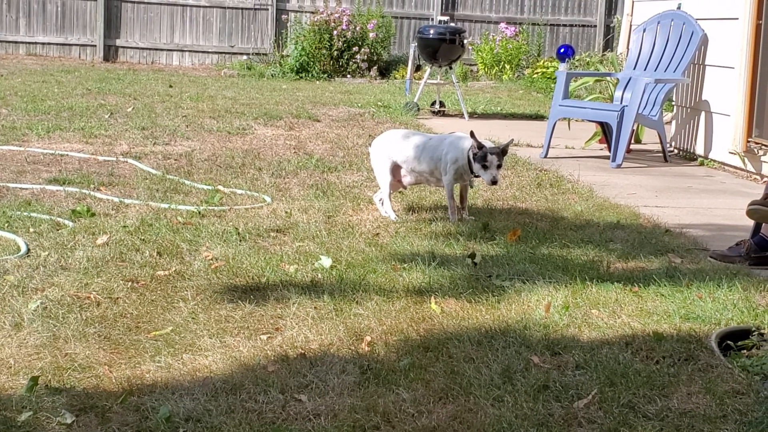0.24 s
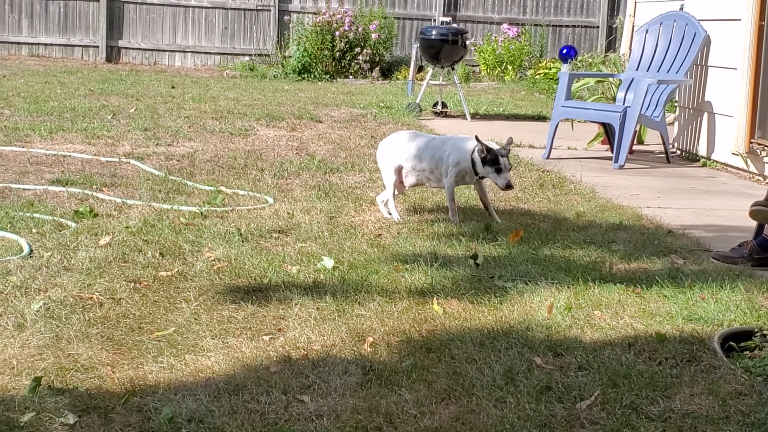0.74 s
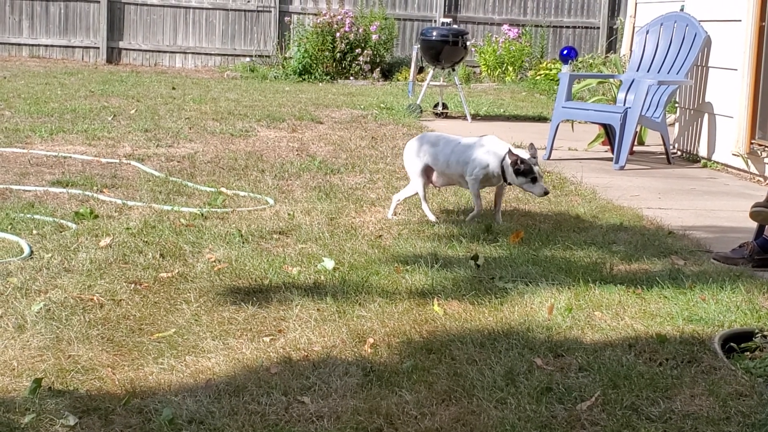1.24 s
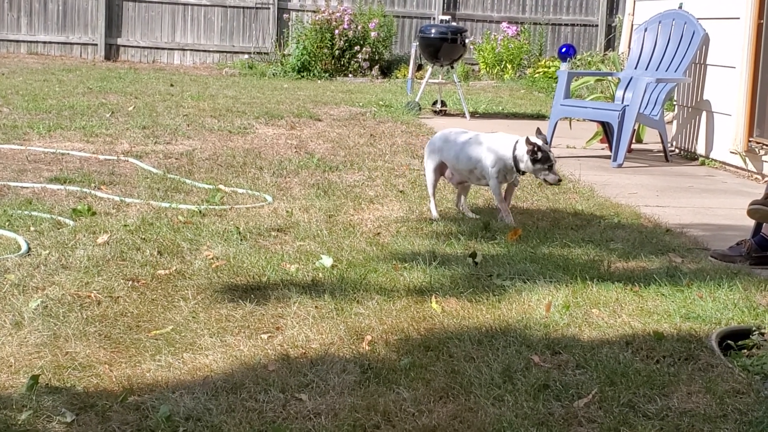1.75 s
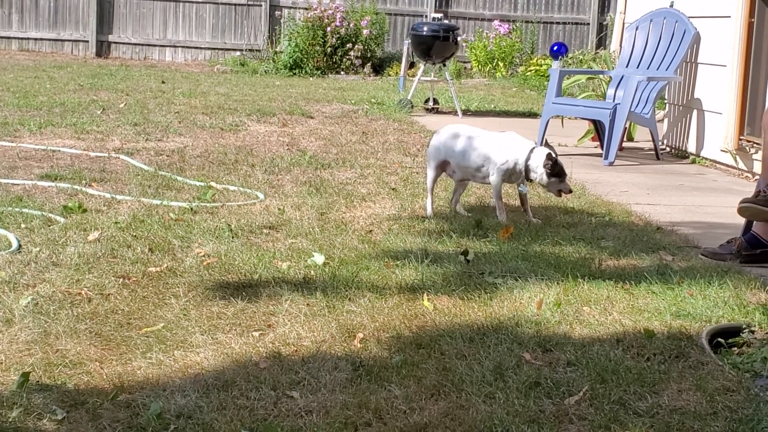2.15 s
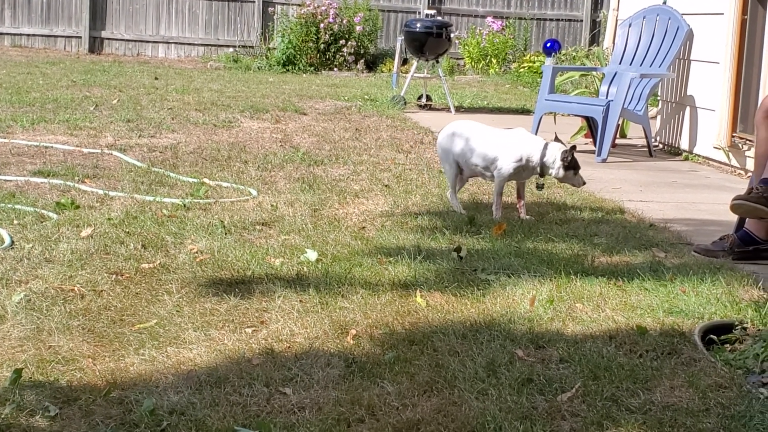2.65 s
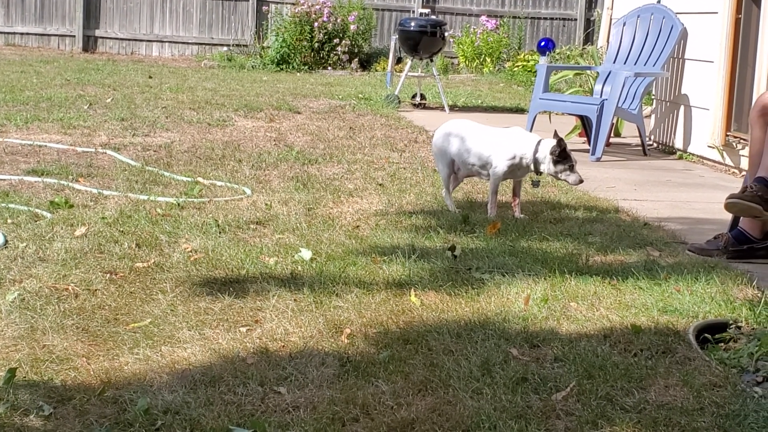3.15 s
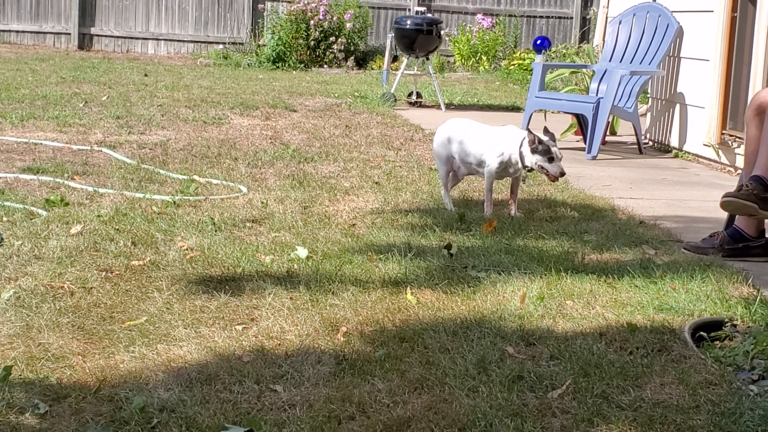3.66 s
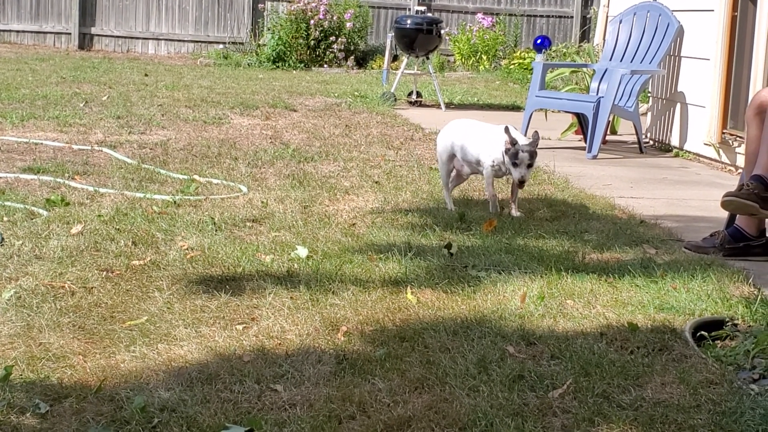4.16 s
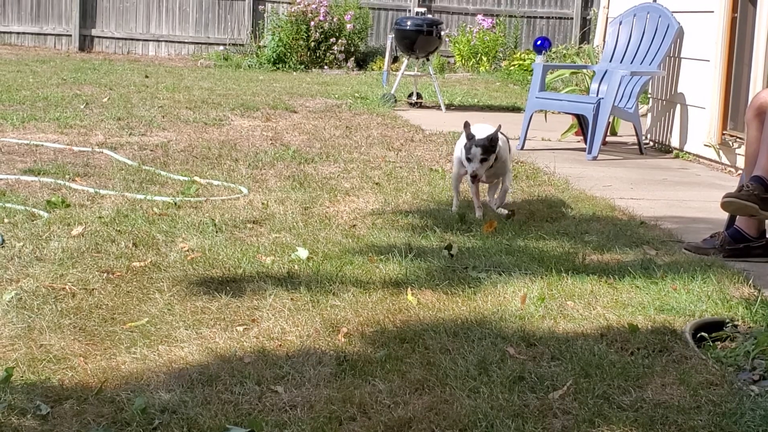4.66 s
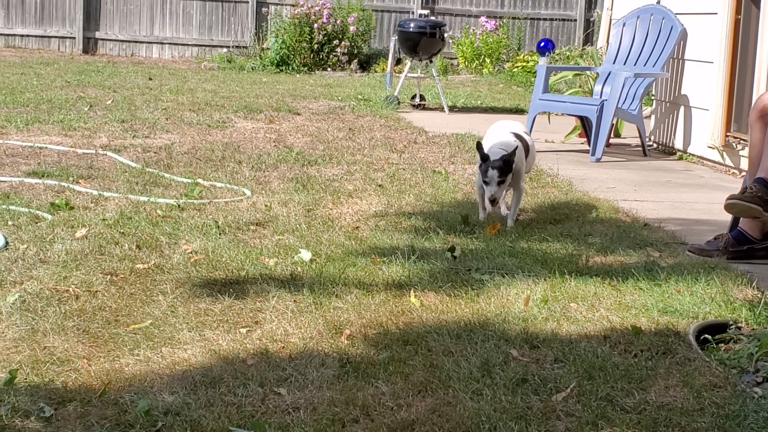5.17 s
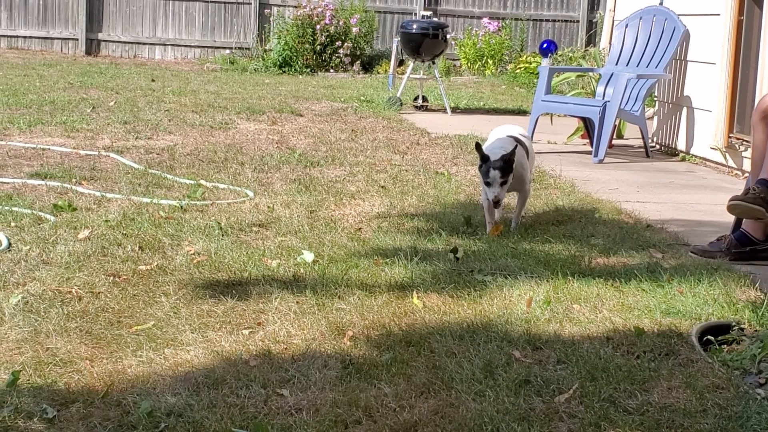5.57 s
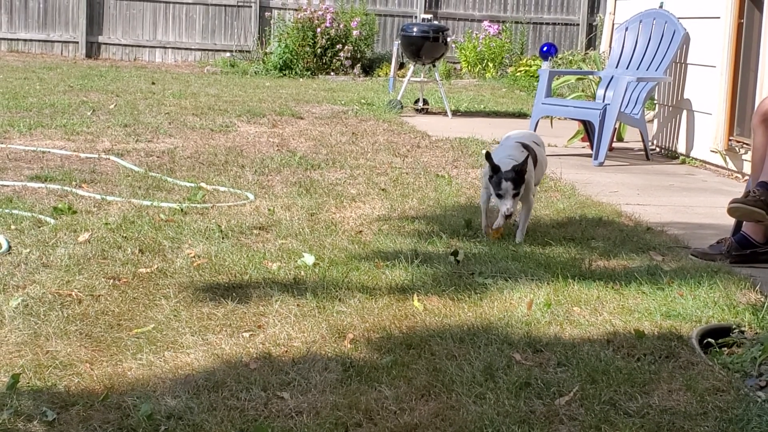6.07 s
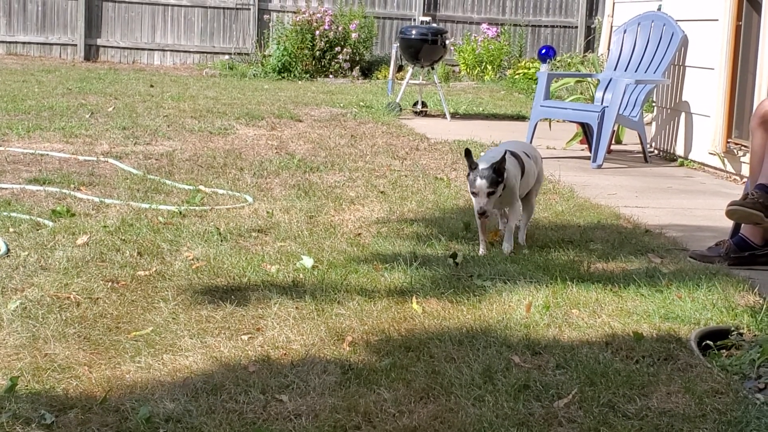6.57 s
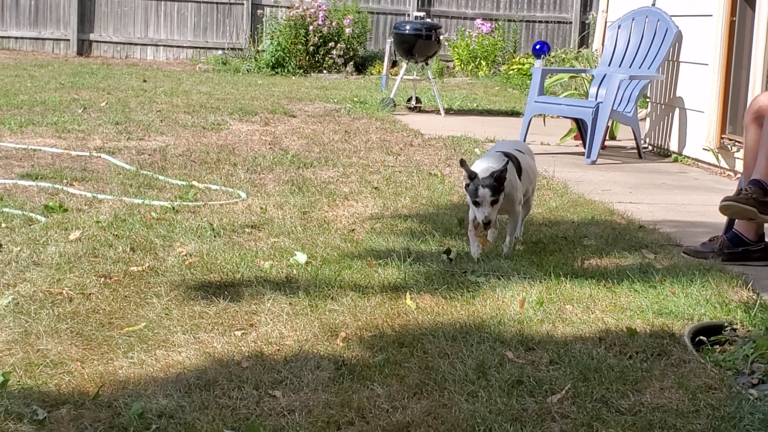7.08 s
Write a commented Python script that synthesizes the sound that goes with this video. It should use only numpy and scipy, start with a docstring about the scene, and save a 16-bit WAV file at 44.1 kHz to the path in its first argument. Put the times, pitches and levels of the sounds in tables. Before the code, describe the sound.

An outdoor stereo microphone sits in a fenced backyard, a road some seventeen metres away. From 0 s a vehicle is already approaching, with a deep throbbing exhaust drone around 55 to 110 Hz over soft rumble and airy tyre noise. The low tones swell and dip unevenly, as if reflected between walls. Very faint grass brushing and stalk ticks come near 1.5 to 1.9 s. The growl thickens to its fullest around 4 s as the vehicle draws abreast; a short soft scuff sounds at 3.6 s and a light step with a snap at 4.2 s. The engine pitch then slides lower as it moves away, while hollow tyre thrum, hiss and tread roar linger, the roar strongest near 6.9 s. A tiny high collar tag clink comes at 5.1 s. Dry-grass steps grow clearer at 5.7, 6.4, 6.9 and 7.2 s, with crisp snaps. The road noise is still present at the end.

```python
"""A vehicle with a deep exhaust passes on a road 16.9 m away, behind a fenced backyard with a two-port
microphone. Crank-locked harmonics sink in pitch by Doppler shift and engine sag; the deepest swell and fade
among the walls. Filtered noise gives the engine's rumble and growl, the tyres' thrum and hiss, and a building
roar of road traffic. Close by, a small dog steps through dry grass (grainy noise bursts and snaps), its collar
tag clinks once as two decaying sines, and something scuffs the ground softly."""
import sys
import numpy as np
from scipy.fft import rfft, irfft
from scipy.io import wavfile

SR = 44100
rng = np.random.default_rng(int(sys.argv[2]) if len(sys.argv) > 2 else 0)


def transcribe(u):
    """Save the signal u as a 16-bit wav file named by the first command-line argument.

    u: samples, shape (n,) or (channels, n), limited to [-1, 1]; the rate is SR.
    q: integer samples, one column per channel.
    """
    v = np.clip(np.atleast_2d(u).T, -1, 1)
    q = np.round(v * 32767).astype(np.int16)
    wavfile.write(sys.argv[1], SR, q)


N = 322812

# The pass: moment abreast of the yard, road speed, closest distance, speed of sound
ABREAST_S, SPEED_M_PER_S, DISTANCE_M, SOUND_M_PER_S = 4.004, 16.0, 16.9, 343
# Crankshaft turns per second when abreast; the engine slowly winds down
CRANK_HZ, SAG_HZ_PER_S = 27.27, 0.131

# Deep exhaust harmonics: crank_order, level_db (abreast, before the fades)
EXHAUST_HARMONICS = [(2, -29.5), (3, -36), (4, -29)]
# Swells and fades of those harmonics among the house walls: time_s, change_db
FADE_ORDER_2 = [(0.08, 0.5), (1.6, -0.5), (2.12, -13), (2.28, -3), (2.56, 3.5), (2.8, -10.5), (3.56, 3.5),
                (4.46, 0), (4.66, 4.5), (4.92, 3.5), (5.36, -12.5), (5.6, -10), (5.95, -5), (6.45, -7),
                (7.2, 0.5)]
FADE_ORDER_3 = [(0.26, 1.5), (3.159, -3.5), (4.18, 6), (4.55, -16), (4.8, 0), (5.5, 7), (6.2, 3),
                (6.55, -0.5), (7.2, 6.5)]
FADE_ORDER_4 = [(0.0, -9), (0.4, 0.5), (2.46, 4), (2.84, -5.5), (3.2, 0.5), (3.4, -8.5), (3.76, 1),
                (4.58, 2), (4.72, -4.0), (5.34, -0.5), (5.84, 5.5), (6.12, 6.5), (7.04, -5.5)]
WAVER_DB = 0.6   # moment-to-moment unevenness of the deep harmonics

# Tailpipe bark, lifted where the pipe points at the yard: crank_order, level_db (abreast, before the lift)
BARK_HARMONICS = [(5, -44.5), (6, -48)]
# Bearing and width of the beam (0 abreast, 1 far past), and the lift at its centre
PIPE_AIM, BEAM_WIDTH, BEAM_DB = 0.43, 0.36, 6

# Weak upper harmonics: crank_order, level_db (relative to the growl level)
UPPER_HARMONICS = [(7, -8.5), (8, -6.5), (9, -12.5), (10, -14.5), (11, -15), (12, -8.5), (13, -16.5)]
SCREENED_DB_PER_STEP = 2.1   # far ahead, the houses screen the top harmonics

# Rumble of uneven firing between the harmonics: frequency_hz, relative_db_per_hz
RUMBLE_SPECTRUM = [(20, -20), (34, -17.5), (48, -6.5), (68, -2), (95, -5), (125, -4.5), (165, -15.5),
                   (220, -27), (400, -73)]
# Engine-bay drone: frequency_hz, relative_db_per_hz
GROWL_SPECTRUM = [(100, -4.5), (160, 6.5), (220, 1), (270, -1), (330, -1.5), (410, -9.5), (520, -27),
                  (800, -42)]
# Level of growl and upper harmonics through the pass: time_s, level_db
GROWL_LEVEL = [(0.0, -61.5), (1.2, -59.5), (1.5, -55.5), (2.4, -54.5), (3.2, -52.5), (3.9, -46),
               (4.9, -50.5), (6.2, -48.4), (7.32, -52)]

# Hollow thrum of the tyre bodies: frequency_hz, relative_db_per_hz
THRUM_SPECTRUM = [(250, -19), (420, -12.5), (510, -5.5), (620, -3), (740, -0.5), (820, 1.5), (950, -20.5),
                  (1300, -47)]
# Roar of general road traffic: frequency_hz, relative_db_per_hz
ROAR_SPECTRUM = [(300, -17), (600, -22), (730, -2), (840, 3), (1030, -0.5), (1300, 2), (1550, -1),
                 (1850, -2.5), (2200, -8), (2900, -14.5), (3600, -17), (6000, -49.5)]
# Level of the traffic roar through the scene: time_s, level_db
ROAR_LEVEL = [(0.0, -44.5), (1.5, -46.5), (3.4, -43), (3.9, -41), (6.1, -40.0), (6.9, -38.0), (7.32, -38.9)]
# Tyre hiss: frequency_hz, relative_db_per_hz
HISS_SPECTRUM = [(1800, -15), (2800, 4.5), (3500, -2), (4400, -2.5), (5000, -2.5), (5700, -5.5),
                 (7200, -6.5), (8100, -6.5), (9100, -24), (12000, -29.5), (16000, -44)]
# Delay of the fence reflection: start_s, end_s (at the start and end of the scene)
ECHO_LAG_S = [.021, .013]

# Paws brushing dry grass: peak_s, level_db (before the grass lift), decay_s
STEPS = [(1.462, -67.5, .05), (4.2, -67, 0.04), (4.57, -70, .05), (5.65, -66, .048), (6.38, -61.5, 0.055),
         (6.54, -72, .06), (6.905, -60, 0.043), (7.243, -57, 0.028)]
STEP_RISE_SHARE = 0.85   # a paw presses down a little faster than the blades settle
# Dry stalks snapping: peak_s, level_db (before the grass lift)
SNAPS = [(1.602, -74), (1.845, -70), (4.189, -62), (6.158, -61), (6.369, -56), (6.476, -65), (7.243, -56)]
# Rustle of the blades: frequency_hz, relative_db_per_hz
GRASS_SPECTRUM = [(2000, -12), (4500, -3.5), (7500, 4), (9500, 0), (13000, -1), (16000, -3)]
GRASS_LIFT_DB = 5

TAG_S = 5.1
# Ringing modes of the collar tag: pitch_hz, level_db, t60_s
TAG_MODES = [(11150, -73, .16), (14500, -74, .11)]

SCUFF_S = 3.58
# Soft scuff on the ground: frequency_hz, relative_db_per_hz
SCUFF_SPECTRUM = [(2200, -21), (3200, -2), (4200, 0), (5500, -2), (7000, -25)]

# Power of the road noise that comes straight over the fence: frequency_hz, share_0_to_1
DIRECT_SHARE = [(200, 0.45), (600, 0.29), (1150, 0.59), (1500, 0.13), (2100, 0.27), (3000, 0.28),
                (6000, 0.05), (12000, 0.06)]
# Colour difference of the two microphone ports: frequency_hz, left_minus_right_db
PORT_COLOUR = [(110, 1.24), (250, 0.5), (360, -2.5), (520, 2), (850, -1), (1300, 0), (2100, -2),
               (2700, 1.5), (3500, -3.5), (4500, -5), (6000, -1), (8000, 2.5), (10000, 0.5), (16000, 4.5)]
# Road sound reaches the left port first by this lag; travel time between the ports
PORT_LAG_S, PORT_SPAN_S = 0.00046, 0.00038
CUTOFF_HZ = 15700


def engine(flutter_db, rumble_db, growl_db):
    """Exhaust pulses locked to the crank, over the rumble and growl of uneven combustion."""
    angle = crank_angle()
    rumble = from_db(rumble_db) * road_noise(RUMBLE_SPECTRUM)
    puffs = 1 + 0.18 * np.cos(2 * angle)   # twice a turn
    growl = from_db(growl_db) * road_noise(GROWL_SPECTRUM) * puffs
    growl_gain = from_db(in_time(GROWL_LEVEL)[0])
    return (exhaust_note(angle) * passing(spreading=1.0, rear_db=0.5)
            + tailpipe_bark(angle) * passing(spreading=0.68, rear_db=3.5)
            + rumble * passing(spreading=0.36, rear_db=1.5)
            + growl_gain * (growl + upper_harmonics(angle, flutter_db)))


def exhaust_note(angle):
    """The deepest harmonics, each swelling and fading among the house walls."""
    note = 0
    fades = (FADE_ORDER_2, FADE_ORDER_3, FADE_ORDER_4)
    for (order, db), fade in zip(EXHAUST_HARMONICS, fades):
        level_db = db + in_time(fade)[0] + WAVER_DB * drift(5.6)
        note = note + from_db(level_db) * harmonic(angle, order)
    return note


def tailpipe_bark(angle):
    """Middle harmonics, beamed by the tailpipe towards one bearing behind the vehicle."""
    _, away = bearing()
    beam = from_db(BEAM_DB * np.exp(-((away - PIPE_AIM) / BEAM_WIDTH) ** 2))
    bark = sum(from_db(db + 1.8 * drift(2.9)) * harmonic(angle, order) for order, db in BARK_HARMONICS)
    return bark * beam


def upper_harmonics(angle, flutter_db):
    """Weak fluttering harmonics; on approach the houses screen the top ones more with each step up."""
    _, away = bearing()
    screened_db = SCREENED_DB_PER_STEP * np.minimum(away, 0)
    upper = 0
    for step, (order, db) in enumerate(UPPER_HARMONICS, -1):   # the lowest is lifted, the second unchanged
        level_db = db + step * screened_db + flutter_db * drift(3.6)
        upper = upper + from_db(level_db) * harmonic(angle, order)
    return upper


def harmonic(angle, order):
    """One harmonic; reflections bend its phase, and odd ones, born of cylinder imbalance, wander most."""
    bend = (0.06 * order + 0.7 * (order % 2)) * drift(0.3)
    apart = 0.058 * drift(0.5) * [[1], [-1]]   # reflections meet the two ports slightly out of step
    pipe_phase = (order - 2) * (order - 4) / 4   # radians; a fixed phase offset per harmonic, zero for orders 2 and 4
    return np.sqrt(2) * np.cos(order * angle + bend + apart - pipe_phase)


def crank_angle():
    """The crank as heard from the yard: slowly sagging, and bent by the Doppler shift."""
    _, away = bearing()
    crank_hz = CRANK_HZ - SAG_HZ_PER_S * (seconds() - ABREAST_S)
    doppler = 1 - away * SPEED_M_PER_S / SOUND_M_PER_S
    return 2 * np.pi * np.cumsum(crank_hz * doppler) / SR


def bearing():
    """Range in metres, and how squarely the vehicle moves away: -1 far ahead, 0 abreast, 1 far past."""
    along = SPEED_M_PER_S * (seconds() - ABREAST_S)
    metres = np.hypot(along, DISTANCE_M)
    return metres, along / metres


def passing(spreading, rear_db):
    """Gain over the pass, 1 when abreast: falls with range (1 = open field), higher behind the vehicle."""
    metres, away = bearing()
    return (DISTANCE_M / metres) ** spreading * from_db(rear_db * away)


def tyres(thrum_db, hiss_db):
    """Thrum and hiss follow the vehicle's nearness and rear lift; a roar of road traffic runs on its own curve."""
    thrum_gain = from_db(thrum_db) * passing(spreading=0.48, rear_db=2.5)
    roar_gain = from_db(in_time(ROAR_LEVEL)[0] + 0.45 * drift(8.9))
    hiss_gain = from_db(hiss_db + 0.32 * drift(6.6)) * passing(spreading=0.47, rear_db=3.0)
    thrum = thrum_gain * road_noise(THRUM_SPECTRUM)
    roar = roar_gain * road_noise(ROAR_SPECTRUM)
    hiss = hiss_gain * road_noise(HISS_SPECTRUM)
    return thrum + roar + hiss


def fence_echo(sound, strength):
    """A reflection whose extra path changes as the vehicle moves, so faint ripples sweep the tyre noise."""
    lag = np.interp(seconds(), [0, N / SR], ECHO_LAG_S)
    late = np.array([np.interp(seconds() - lag, seconds(), side) for side in sound])
    return (sound + strength * late) / np.sqrt(1 + strength ** 2)


def road_noise(spectrum):
    """Noise at two spaced ports: part straight from the road, part scattered round the yard."""
    straight, mid, side = white(count=3)
    share = np.clip(over_hz(DIRECT_SHARE), 0, 1)
    alike = np.sinc(2 * bins() * PORT_SPAN_S)   # scattered sound is most alike at both ports in the bass
    common = np.sqrt(1 + alike) * mid
    opposed = np.sqrt(1 - alike) * side * [[1], [-1]]
    scattered = (common + opposed) / np.sqrt(2)
    direct = np.array([straight, straight * np.exp(-2j * np.pi * bins() * PORT_LAG_S)])
    both = np.sqrt(share) * direct + np.sqrt(1 - share) * scattered
    return rms_one(irfft(both * from_db(over_hz(spectrum)), N))


def paws(grain_db, snap_rise_s, snap_decay_s):
    """Each step crushes many dry blades in a grainy rustle; single stalks snap sharply."""
    crush = sum(from_db(db) * swell(at, STEP_RISE_SHARE * decay, decay) for at, db, decay in STEPS)
    snaps = sum(from_db(db) * swell(at, snap_rise_s, snap_decay_s) for at, db in SNAPS)
    grain = rms_one(from_db(grain_db * drift(250)))
    return from_db(GRASS_LIFT_DB) * close_noise(GRASS_SPECTRUM) * (crush * grain + snaps)


def collar_tag():
    """A light touch rings the small metal tag in decaying modes."""
    t = np.maximum(seconds() - TAG_S, 0)
    return sum(from_db(db - 60 * t / t60) * np.sin(2 * np.pi * hz * t) for hz, db, t60 in TAG_MODES)


def scuff(level_db, rise_s, decay_s):
    """Something slides briefly over the ground: one swell of filtered noise."""
    return from_db(level_db) * swell(SCUFF_S, rise_s, decay_s) * close_noise(SCUFF_SPECTRUM)


def close_noise(spectrum):
    """Shaped noise close to the microphone, unrelated at the two ports."""
    return rms_one(irfft(white(count=2) * from_db(over_hz(spectrum)), N))


def swell(at, rise, decay):
    """An envelope that grows exponentially to 1 at a moment and dies away."""
    t = seconds() - at
    return np.exp(np.maximum(np.minimum(t / rise, -t / decay), -40))


def from_db(db):
    """Decibels to gain."""
    return 10 ** (np.asarray(db) / 20)


def rms_one(x):
    """Scale to unit power."""
    return x / np.sqrt(np.mean(x ** 2) + 1e-20)


def seconds():
    """Time of every sample."""
    return np.arange(N) / SR


def bins():
    """Frequency of every spectral bin, at least 1 Hz."""
    return np.maximum(np.fft.rfftfreq(N, 1 / SR), 1)


def in_time(rows):
    """One control, joined by straight lines, per column of a curve table."""
    s, *columns = np.transpose(rows)
    return [np.interp(seconds(), s, c) for c in columns]


def over_hz(points):
    """Join (Hz, value) points on a log-frequency axis."""
    hz, value = np.transpose(points)
    return np.interp(np.log(bins()), np.log(hz), value)


def white(count):
    """Spectra of unrelated white noises."""
    return rfft(rng.standard_normal((count, N)))


def drift(rate):
    """Slow chance with spread 1, changing about `rate` times a second."""
    return rms_one(irfft(white(count=1)[0] / (1 + (bins() / rate) ** 2), N))


def scene():
    """The vehicle beyond the fence, and the dog in the dry grass close by."""
    motor = engine(flutter_db=2.5, rumble_db=-38.0, growl_db=-0.04)
    road = fence_echo(tyres(thrum_db=-46.0, hiss_db=-52.0), strength=0.21)
    dog = paws(grain_db=2.8, snap_rise_s=0.001, snap_decay_s=0.004) + collar_tag()
    return motor + road + dog + scuff(level_db=-51.0, rise_s=0.025, decay_s=0.038)


def record(dry):
    """Each microphone port colours the sound in its own way; the top is cut steeply."""
    colour = from_db(over_hz(PORT_COLOUR) * [[0.5], [-0.5]])
    low_pass = 1 / np.sqrt(1 + (bins() / CUTOFF_HZ) ** 400)
    return irfft(rfft(dry) * colour * low_pass, N)


dry = scene()
out = record(dry)
transcribe(out)
```